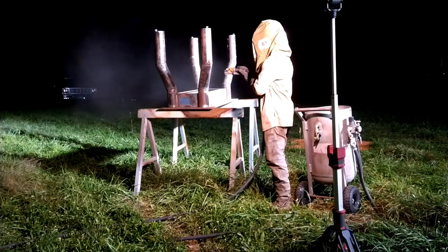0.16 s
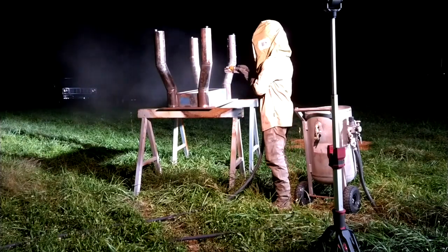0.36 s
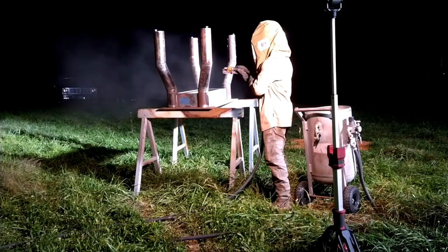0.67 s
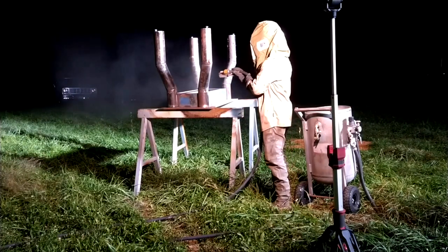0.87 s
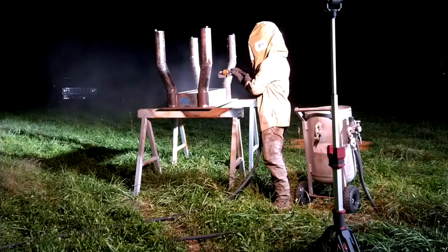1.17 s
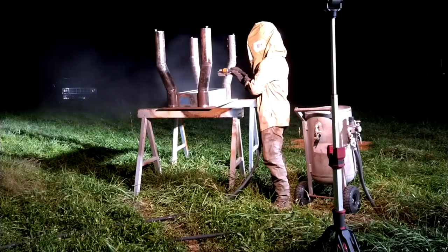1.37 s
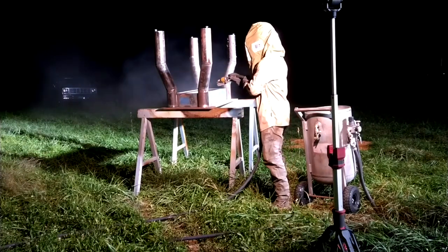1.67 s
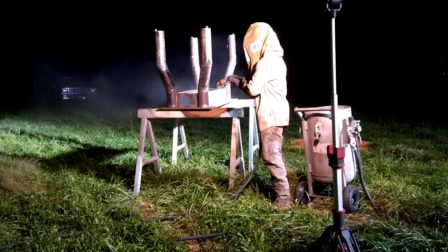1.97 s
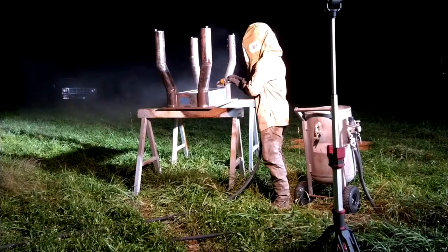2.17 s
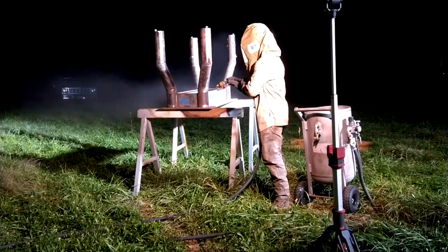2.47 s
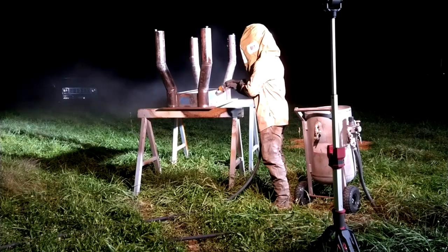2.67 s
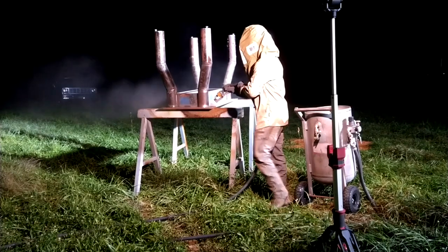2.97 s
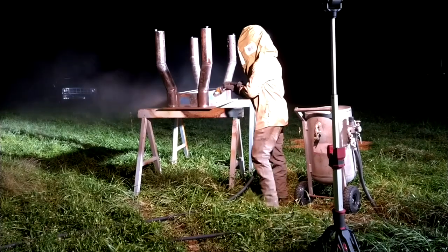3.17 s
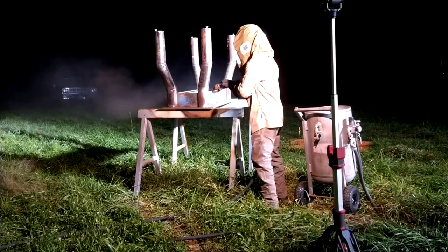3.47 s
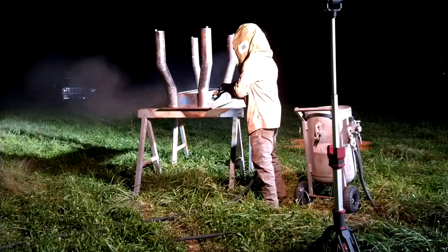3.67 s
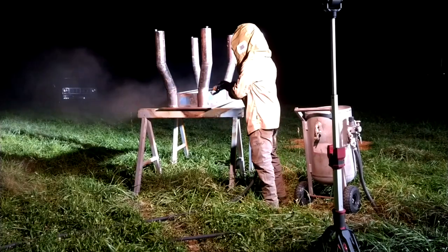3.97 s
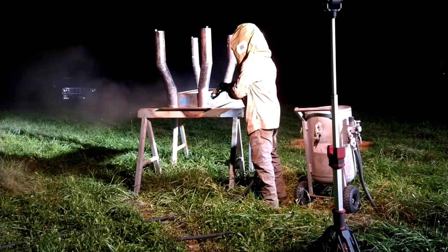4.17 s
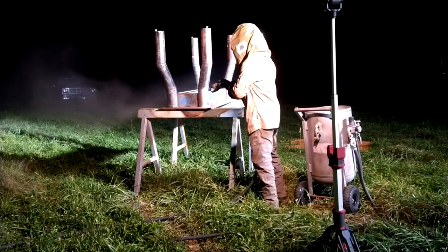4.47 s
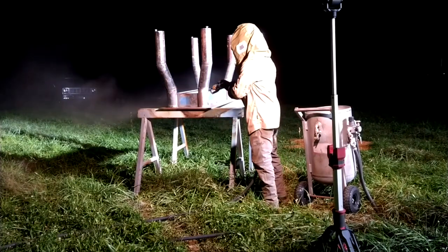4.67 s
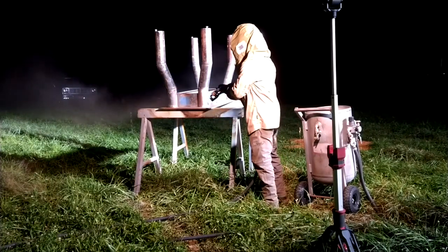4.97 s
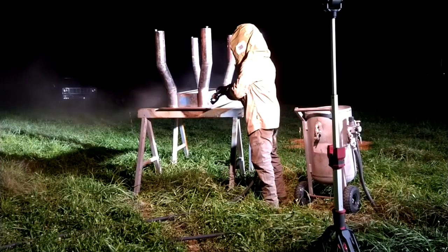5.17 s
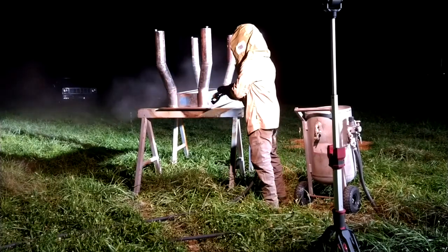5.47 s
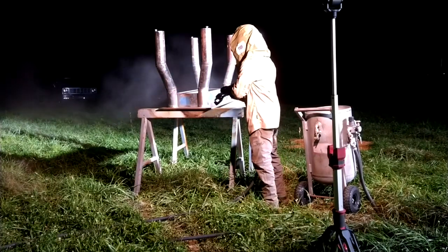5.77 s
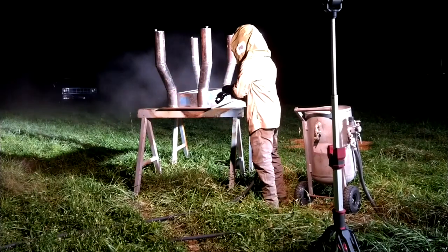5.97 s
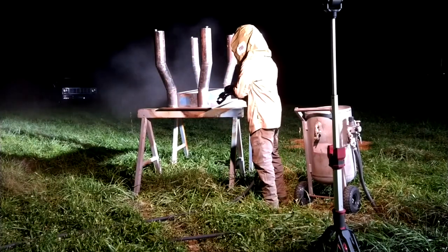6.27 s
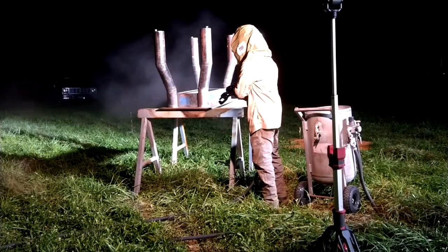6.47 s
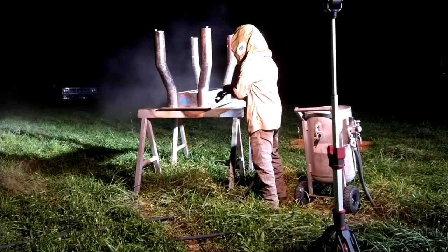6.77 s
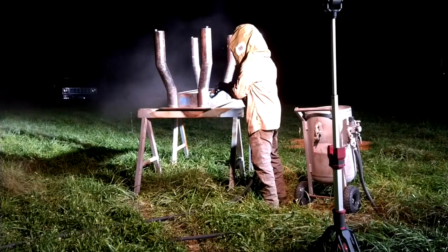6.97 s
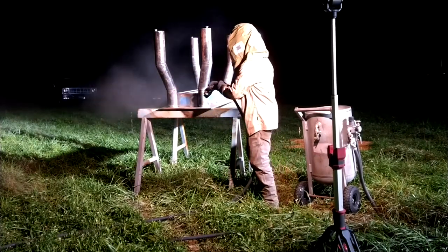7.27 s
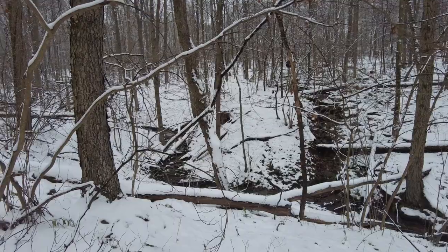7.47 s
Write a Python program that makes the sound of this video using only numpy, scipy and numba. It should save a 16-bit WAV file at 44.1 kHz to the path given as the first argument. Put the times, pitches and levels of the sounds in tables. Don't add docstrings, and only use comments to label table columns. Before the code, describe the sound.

A sandblaster hisses loudly against a ringing steel table outdoors, over compressor chugging and wind rumble, then cuts abruptly to near-silent low breeze.

```python
import sys
import numpy as np
from scipy import signal
from scipy.fft import rfft, irfft, next_fast_len
from scipy.io import wavfile
from scipy.ndimage import uniform_filter1d
from numba import njit

SR = 44100
rng = np.random.default_rng(int(sys.argv[2]) if len(sys.argv) > 2 else 0)


def field_ratio(decibels):
    return 10 ** (np.asarray(decibels, dtype=float) / 20)


def transcribe(signal):
    frames = np.atleast_2d(signal).T
    limited = np.clip(frames, -1, 1)
    pcm = np.round(limited * 32767).astype(np.int16)
    wavfile.write(sys.argv[1], SR, pcm)


N = 336042
FAST = next_fast_len(N + 8192)
LINE_HZ = np.fft.rfftfreq(FAST, 1 / SR)


def curve(table):
    s, *columns = np.transpose(table)
    return [np.interp(np.arange(N) / SR, s, column) for column in columns]


def bumps(table):
    s, length, *columns = np.transpose(table)
    bell = np.exp(-((np.arange(N)[:, None] / SR - s) * 2 / length) ** 2)
    return [bell @ column for column in columns]


def over_hz(table):
    hz, value = np.transpose(table)
    return np.interp(np.log(LINE_HZ + 1), np.log(hz + 1), value)


def shape(x, gain):
    return irfft(rfft(x, FAST) * gain, FAST)[..., :N]


def unit(x):
    return x / np.sqrt(np.mean(x ** 2))


def walk(rate, size=N):
    hold = int(SR / rate)
    held = np.repeat(rng.standard_normal(size // hold + 2), hold)
    return 1.3 * uniform_filter1d(uniform_filter1d(held, hold), hold)[:size]


def later(x, ms):
    place = np.arange(N) - ms * SR / 1000
    whole = np.floor(place).astype(int)
    out = np.zeros(N)
    for k in range(-3, 5):
        offset = place - whole - k
        out += x[np.clip(whole + k, 0, N - 1)] * np.sinc(offset) * np.cos(offset / 3)
    return out


@njit
def resonate(x, hz, width):
    y, band, low = np.empty(len(x)), 0., 0.
    for i in range(len(x)):
        g, damping = np.tan(np.pi * hz[i] / SR), width / hz[i]
        v = (band + g * (x[i] - low)) / (1 + g * (g + damping))
        band, low, y[i] = 2 * v - band, low + 2 * g * v, damping * v
    return y


# pitch_hz, density_db (per Hz)
JET_COLOUR = [(120, -43.5), (200, -13.5), (375, -16), (600, -16), (900, -19.5), (1300, -13.5),
              (2100, -17.5), (2850, -11), (3600, -5), (5650, -4), (6300, -5), (7460, -2), (11600, -4),
              (13700, -3), (16500, -2.5)]
# start_s, flow_db, aim (0 = past the legs into open air, 1 = down into the frame)
NOZZLE = [(0, -23, 0.19), (.5, -24, 1), (1.05, -22.5, 0.31), (1.5, -21.5, 0.3), (1.75, -23, 0.23),
          (2.1, -21, 0.22), (2.5, -23, 0.65), (2.8, -21.5, 0.72), (3.07, -21, 0.11), (3.45, -21, 0.4),
          (3.85, -21.5, 0.55), (4.55, -22, 0.95), (5.1, -20.5, .7), (5.55, -23, 0.19), (6, -20, 0),
          (6.5, -22, 0), (6.9, -22, 0), (7.3, -20.5, 1)]
AIM_DB = [1, 1, 2.1, -3.5]
# centre_s, length_s, hiss_db, roar_db
SPUTTERS = [
    (.63, .1, -1, 0),
    (1.39, .12, -5, 4),
    (1.73, .06, -1, 3),
    (2.84, .06, -2.5, 1),
    (3.49, .08, -0.5, 7),
    (4.7, .1, -2, 2.5),
    (5.68, .08, 3, 1),
    (6.28, .08, -0.5, 2.5),
    (6.72, 0.23, 0.7, 10),
    (6.92, .06, -4, 1),
]


def jet():
    flow_db, aim = curve(NOZZLE)
    dip_db, puff_db = bumps(SPUTTERS)
    aim_moves_db = np.outer(AIM_DB, aim - .5)
    grit = rng.standard_normal(N) * field_ratio(1.3 * rng.exponential(size=N))
    spectrum = rfft(grit, FAST) * field_ratio(over_hz(JET_COLOUR))
    octave = np.log2(LINE_HZ + 1)
    region_octaves = np.log2([700, 3600, 7000, 12500])
    puff_hz, puff_octaves = 790, .8
    hiss, flicker = 0, walk(8)
    for centre in np.arange(7.5, 14.1, .5):
        band = irfft(spectrum * np.clip(1 - 2 * abs(octave - centre), 0, 1), FAST)[:N]
        weights = [np.interp(centre, region_octaves, row) for row in np.eye(4)]
        flicker = 0.5 * flicker + 0.8 * walk(8)
        puff = puff_db * np.exp(-((centre - np.log2(puff_hz)) / puff_octaves) ** 2)
        hiss = hiss + band * field_ratio(np.dot(weights, aim_moves_db) + puff + .9 * flicker + 1.3 * walk(16))
    surge_db = -0.08 * walk(9) + 0.5 * walk(25)
    return unit(hiss + steel(hiss)) * field_ratio(flow_db + dip_db + 10.0 + surge_db)


# pitch_hz, width_hz, level_db (over the hiss)
LEG = [(418, 60, 2), (970, 110, 5), (2380, 100, 8.5), (2810, 90, 2.5), (3810, 74, 3.5), (5024, 110, 6.5),
       (5640, 220, 4), (7310, 140, 4.5), (9220, 260, 4), (10140, 140, 8), (10290, 130, 2),
       (12450, 160, 4.5)]
SHIN = [(544, 63, 4), (1020, 110, 2.2), (2410, 100, 4.2), (4710, 230, 4.7), (5570, 200, 5.9),
        (7230, 170, 3.1), (9100, 140, 3.5), (10030, 130, 5.3), (10320, 130, 5.5)]
BRACE = [(652, 90, 1.7), (2295, 150, 3.5), (3646, 220, 5), (4310, 110, 3), (5570, 94, 1.3), (7300, 130, 4),
         (8000, 150, 3), (9170, 560, 4.5), (10800, 130, 3)]
RIM = [(2230, 230, 3.4), (4360, 170, 1.5), (3620, 200, 1.2), (5900, 200, 2.5), (7860, 330, 5),
       (8550, 200, 3), (9220, 250, 5)]
FOOT = [(570, 82, 4), (3060, 110, 4.9), (3726, 130, 7.5), (4670, 330, 4.9), (5550, 98, 3), (7170, 170, 2),
        (7720, 120, 2.5), (10060, 200, 4.5), (10440, 140, 3), (13840, 150, 3.4)]
CORNER = [(620, 140, 5.5), (3110, 95, 4), (4850, 200, 3.1), (5660, 130, 11.2), (6690, 120, 3.5),
          (10380, 140, 4), (11100, 150, 4), (13700, 200, 3)]
RAIL = [(612, 95, 4.8), (2980, 100, 4.3), (3710, 180, 6.9), (4260, 100, 4), (4780, 150, 5.9),
        (5670, 170, 1.9), (7300, 190, 4.4), (10730, 130, 4)]
SHEET = [(2170, 150, 5), (3640, 120, 3.7), (4380, 140, 6.3), (6030, 86, 2.5), (7530, 180, 4),
         (8620, 140, 4.3), (11270, 110, 1.2), (13470, 200, 3)]
EDGE = [(1750, 120, 2.5), (4320, 88, 4.7), (4930, 100, 1.5), (5620, 96, 2), (8300, 220, 1),
        (8740, 110, 3.5), (12140, 180, 2), (13400, 200, 2)]
# part (its modes), start_s, end_s
SWEEP = [
    (LEG, 0, 1.17),
    (SHIN, 1.21, 1.98),
    (FOOT, 2.06, 2.88),
    (CORNER, 3, 3.26),
    (RAIL, 3.31, 3.98),
    (BRACE, 4, 4.92),
    (SHEET, 5, 5.98),
    (EDGE, 5.89, 7.05),
    (RIM, 6.92, 7.6),
]


def steel(hiss):
    cross_s, slide = .3, .004
    core_share, core_narrow = 0.76, 7.4
    out = np.zeros(N)
    for modes, start, end in SWEEP:
        first = max(int((start - cross_s / 2) * SR), 0)
        span = slice(first, int((end + cross_s / 2) * SR))
        t = np.arange(N)[span] / SR
        landing = np.clip(np.minimum(t - start if start else 1, end - t) / cross_s + .5, 0, 1)
        for hz, width, db in modes:
            centre = hz * (1 + slide * walk(2.5, len(t)))
            core = centre + 0.32 * width * rng.standard_normal()
            ring = resonate(hiss[span], centre, 1. * width)
            ring = ring + core_share * resonate(hiss[span], core, width / core_narrow)
            wander_db = .6 * walk(3, len(t)) + .9 * walk(8, len(t))
            out[span] += landing * (field_ratio(db + 3) - 1) * field_ratio(wander_db) * ring
    return out


# start_s, lag_ms, share
GROUND = [(0, 2.12, .5), (1.5, 2.09, .43), (1.9, 1.95, .35), (2.3, 1.79, .5), (2.9, 1.65, .65),
          (3.3, 1.69, .65), (4.9, 1.73, .6), (6.6, 1.6, .36), (7.0, 1.69, .4), (7.3, 1.71, .55)]
# start_s, lag_ms, share (negative = inverted)
TOP = [(2.75, 1.48, 0), (3.06, 1.466, .5), (3.3, 1.466, .45), (3.62, 1.45, .12), (3.8, 1.426, .42),
       (3.95, 1.426, .35), (4.02, 1.43, 0), (4.9, 1.458, 0), (5.1, 1.45, -.38), (5.42, 1.454, -.4),
       (5.7, 1.45, -.3), (5.95, 1.466, -.55), (6.4, 1.468, -.62), (6.75, 1.48, -.5), (7, 1.455, -.35),
       (7.15, 1.45, 0)]


def echoes(x):
    ground_hz, top_from_hz = 2000, 3000
    lag, share = curve(GROUND)
    dull = shape(x, 1 / (1 + (LINE_HZ / ground_hz) ** 2))
    top_lag, top_share = curve(TOP)
    bright = shape(x, 1 - 1 / (1 + (LINE_HZ / top_from_hz) ** 4))
    with_top = (x + top_share * later(bright, top_lag)) / np.sqrt(1 + top_share ** 2)
    return with_top + share * later(dull, lag)


# pitch_hz, level_db (left minus right)
LEFT_LOSS = [(60, -4.5), (110, 2), (200, -4.5), (380, -0.5), (700, -1.5), (1290, -5.5), (2380, -10.5),
             (4400, -18.5), (8120, -30.5), (15000, -22)]
LEFT_ALIKE = [(60, .95), (700, .82), (1400, .76), (3000, .86), (6000, .84), (15000, .76)]
# pitch_hz, phase_rad
LEFT_PHASE = [(0, 0), (340, -1.28), (600, -0.89), (2410, -1.2), (3100, -1.5), (4220, -0.68), (4740, -0.8),
              (5000, -0.1), (5770, -0.2), (10700, 1.6), (11500, 2.0), (12500, -0.4), (14600, 0.4),
              (16600, -0.2)]
# pitch_hz, dip_db
LEFT_DIPS = [(3370, 4), (4100, 2), (4650, 3), (6200, 7), (6930, 5), (7600, 3), (8200, 5), (8870, 2),
             (9740, 6), (10750, 4), (11630, 4), (12950, 2), (13900, 2), (14700, 2)]


def shadowed(x):
    alike = over_hz(LEFT_ALIKE)
    dips_db = sum(db * np.exp(-((LINE_HZ - hz) / 170) ** 2) for hz, db in LEFT_DIPS)
    loss = field_ratio(over_hz(LEFT_LOSS) - 2.2 - dips_db)
    direct = shape(x, loss * alike * np.exp(1j * over_hz(LEFT_PHASE)))
    late_ms = 60 + 4 * walk(1.5)
    late = later(shape(x, loss * np.sqrt(1 - alike ** 2)), late_ms)
    return np.array([direct + late, x])


# pitch_hz, level_db
PUMP = [(60, -16.5), (73, -7.5), (82, -1), (100, -0.5), (119, -7), (135, -12.5), (165, -15.5), (260, -31)]
# pitch_hz, level_db (rms), pan_db (left minus right)
HUM = [
    (49.8, -39.5, -0.5),
    (139.9, -45, 1),
    (149.1, -51.5, -3),
    (257, -58, 4.5),
]


def compressor():
    t = np.arange(N) / SR
    stroke_hz, pump_db = 9.13, -38.5
    strokes = np.cumsum(stroke_hz * (1 + .004 * walk(2))) / SR
    kicks = np.diff(np.floor(strokes), prepend=0) * field_ratio(1.0 * walk(10))
    phase = -2 * np.pi * np.sin(over_hz(PUMP) / 6)
    pump = unit(shape(kicks, field_ratio(over_hz(PUMP)) * np.exp(1j * phase)))
    out = field_ratio(pump_db) * pump * field_ratio(np.array([[.6], [-.6]]))
    for hz, db, pan_db in HUM:
        sway_db = np.array([pan_db / 2 + .5 * walk(2.2), -pan_db / 2 + 1.0 * walk(3.7)])
        cycles = hz * t + rng.random() + .02 * walk(2.2)
        out = out + np.sqrt(2) * field_ratio(db + sway_db) * np.sin(2 * np.pi * cycles)
    return out


# centre_s, peak_db, pitch_hz
THUMPS = [(2.2, -20, 101), (2.315, -29, 105), (2.362, -20, 125), (2.4, -22, 100), (2.51, -26, 80),
          (2.593, -19, 148.4), (2.659, -14.5, 115), (2.712, -15.5, 95), (2.775, -18, 100),
          (2.825, -26, 101), (2.985, -25, 90), (3.121, -20, 109)]


def thumps():
    t = np.arange(N) / SR
    out = np.zeros(N)
    for s, db, hz in THUMPS:
        near = slice(int((s - .04) * SR), int((s + .04) * SR))
        cycles = (t[near] - s) * hz
        out[near] += field_ratio(db) * np.exp(-(cycles / .65) ** 2) * np.cos(2 * np.pi * cycles)
    return np.array([out, .3 * out])


def breeze(level_db, colour, side, lumpy_db):
    def layer():
        lumpy = rng.standard_normal(N) * field_ratio(lumpy_db * walk(40))
        return unit(shape(lumpy, field_ratio(over_hz(colour))))
    mid, diff = layer(), layer()
    return field_ratio(level_db) * np.array([mid + side * diff, mid - side * diff])


# pitch_hz, level_db
WIND_COLOUR = [(15, -50.5), (38, -28), (60, -5), (95, 0), (130, -4.5), (200, -11), (320, -13), (600, -28.5)]
# centre_s, length_s, level_db
GUSTS = [
    (1.24, .4, 1.5),
    (2.6, .45, 5.5),
    (3.85, .3, -4.5),
    (5.2, .3, -3),
    (5.8, .3, -4),
]


def yard_wind():
    level_db = -37.5 + bumps(GUSTS)[0]
    return field_ratio(-1.5) * breeze(level_db, WIND_COLOUR, side=0.72, lumpy_db=2.5) + thumps()


# start_s, level_db
WOOD = [
    (7.34, -62),
    (7.4, -47),
    (7.445, -44),
    (7.48, -48.5),
    (7.62, -48),
]
# pitch_hz, density_db (per Hz)
WOOD_COLOUR = [(12, -30), (20, 2), (44, -1.5), (114, -19), (179, -4), (323, -28), (729, -31), (816, -33),
               (1790, -30), (9410, -43), (16500, -53)]


def wood():
    return field_ratio(-13.5) * breeze(curve(WOOD)[0], WOOD_COLOUR, side=0.36, lumpy_db=1.5)


def scene():
    cut_s = 7.3235
    t = np.arange(N) / SR
    yard = shadowed(echoes(jet())) + compressor() + yard_wind()
    return np.where(t < cut_s, yard, wood())


def band_limit(x):
    return signal.sosfilt(signal.butter(12, 15880, fs=SR, output="sos"), x)


def record(dry):
    top_hz = 15820
    wall = np.clip((top_hz - LINE_HZ) / 60, 0, 1)
    rounded = .85 * np.tanh(1.29 * dry)
    return band_limit(shape(rounded, wall))


dry = scene()
out = record(dry)
transcribe(out)
```